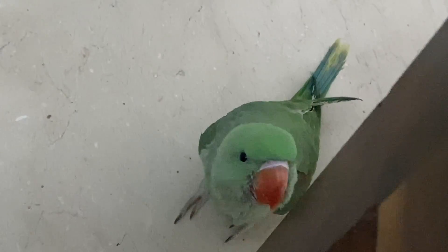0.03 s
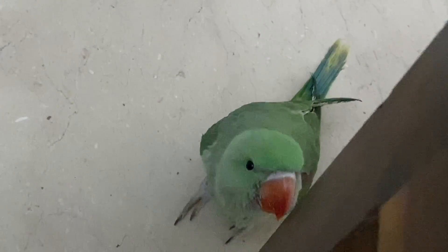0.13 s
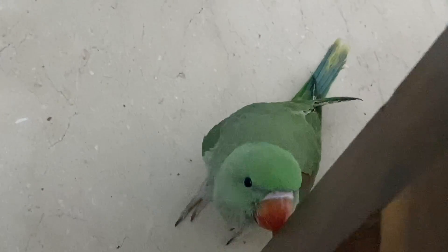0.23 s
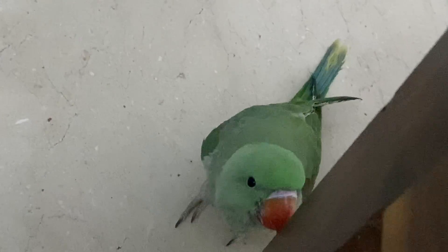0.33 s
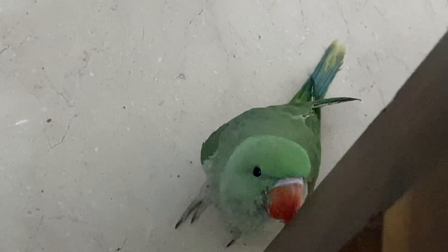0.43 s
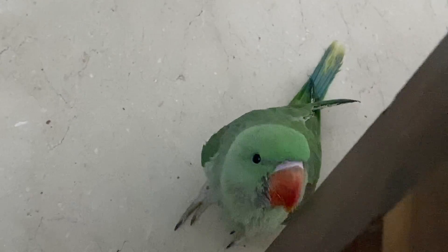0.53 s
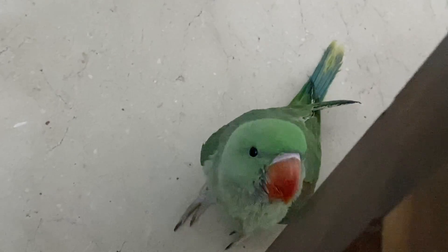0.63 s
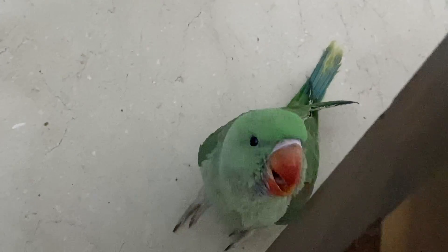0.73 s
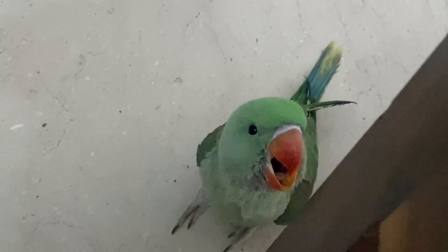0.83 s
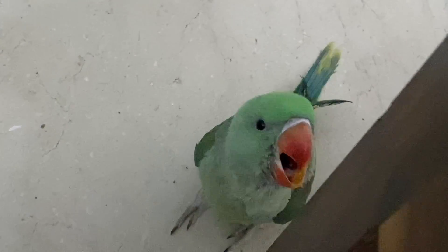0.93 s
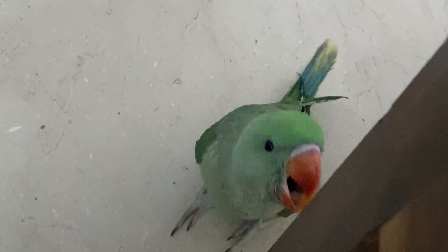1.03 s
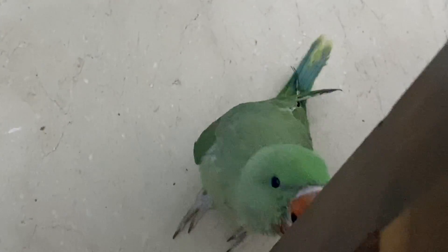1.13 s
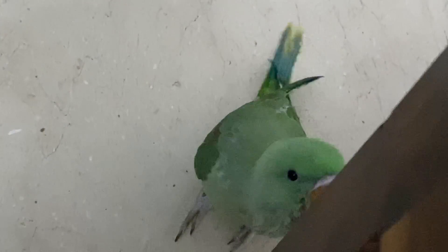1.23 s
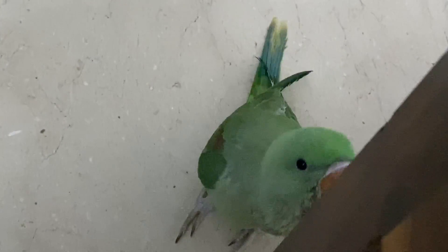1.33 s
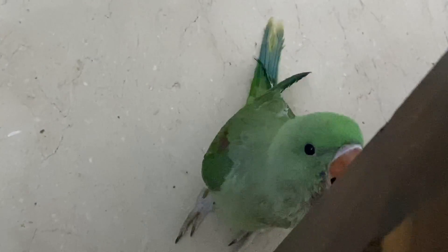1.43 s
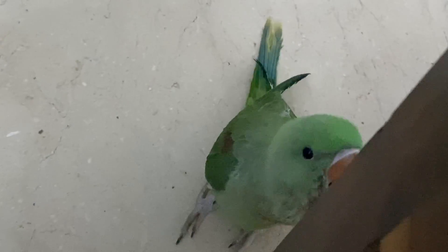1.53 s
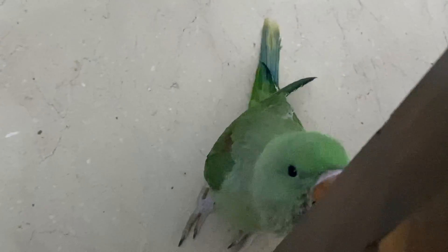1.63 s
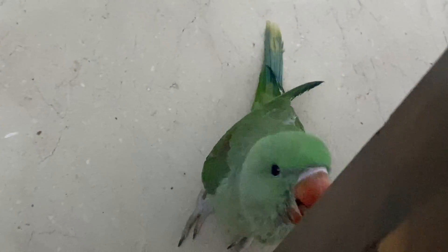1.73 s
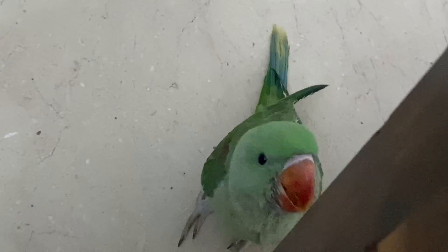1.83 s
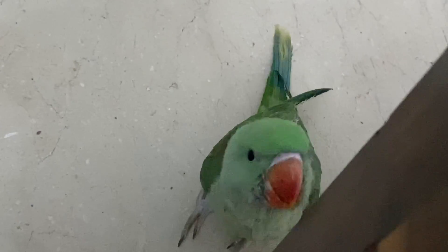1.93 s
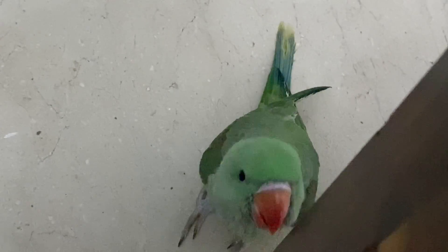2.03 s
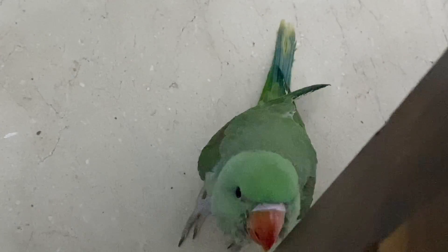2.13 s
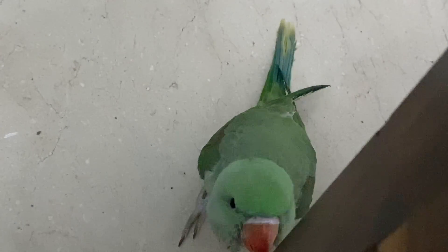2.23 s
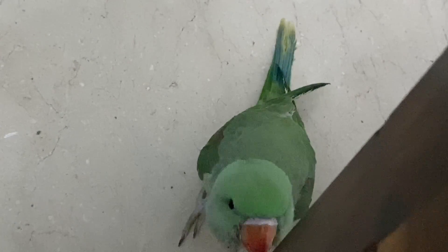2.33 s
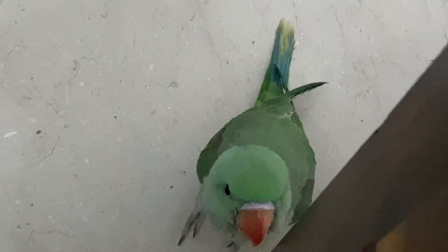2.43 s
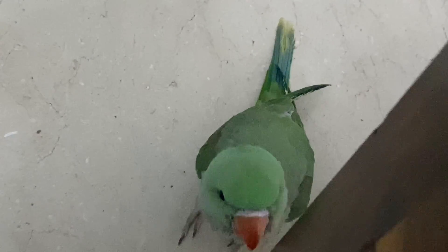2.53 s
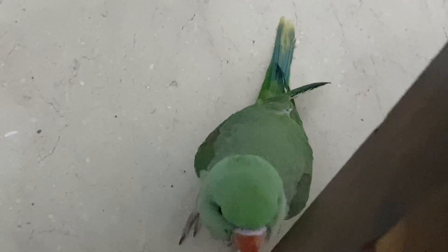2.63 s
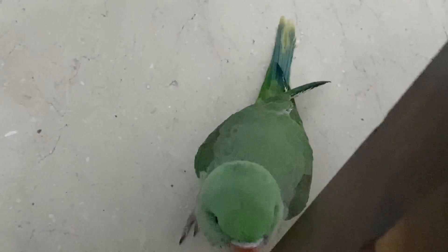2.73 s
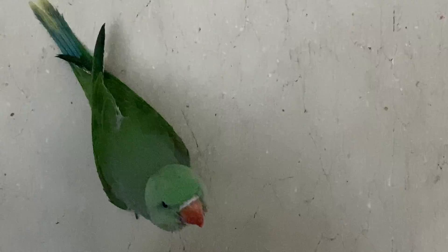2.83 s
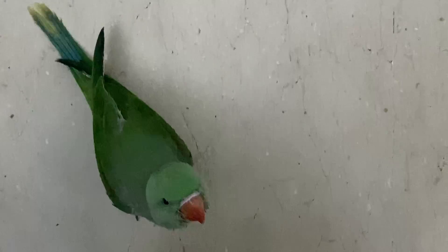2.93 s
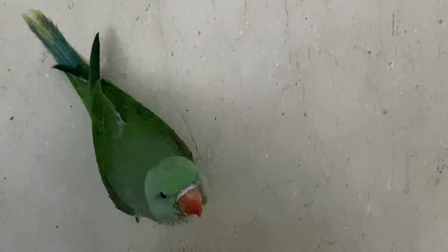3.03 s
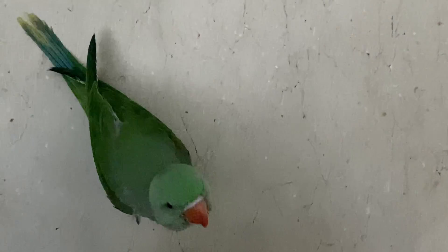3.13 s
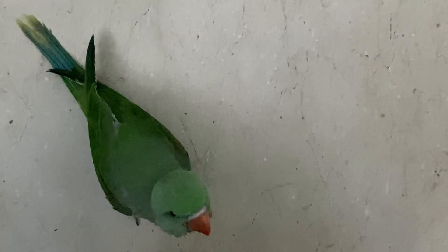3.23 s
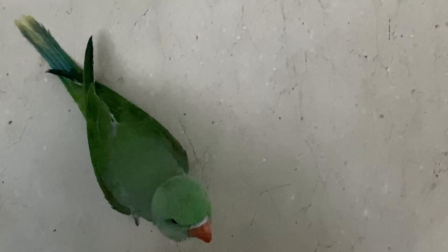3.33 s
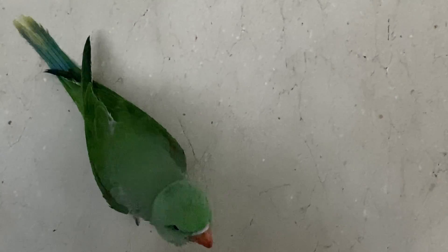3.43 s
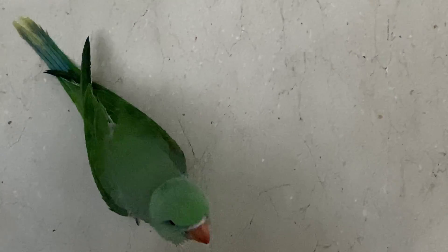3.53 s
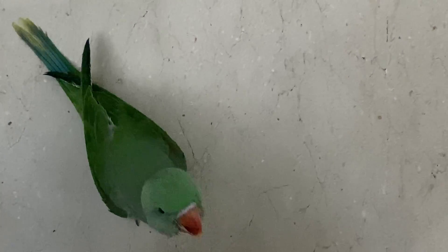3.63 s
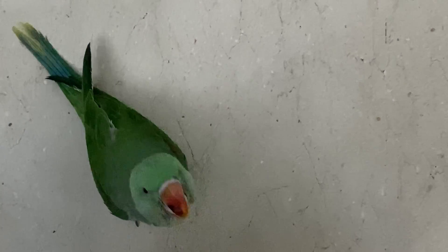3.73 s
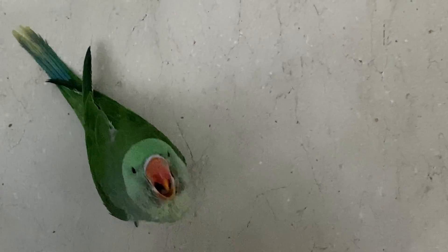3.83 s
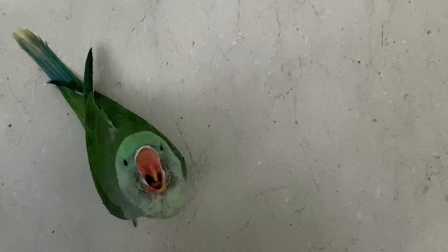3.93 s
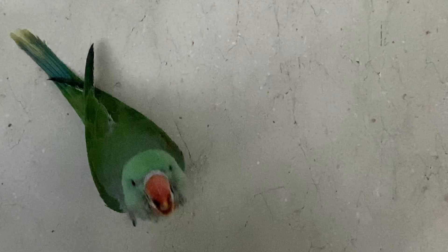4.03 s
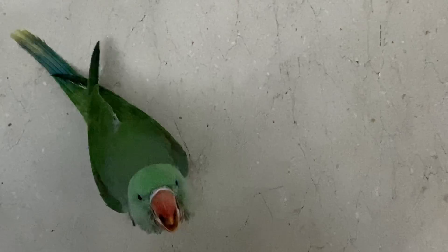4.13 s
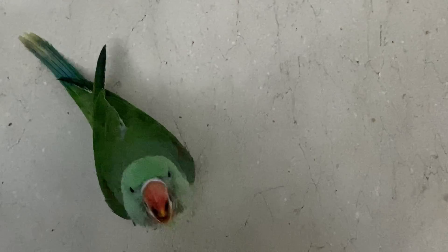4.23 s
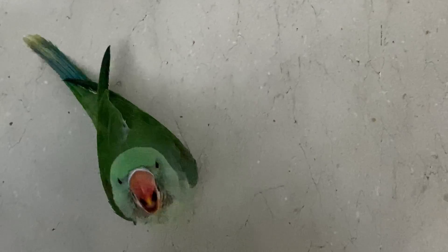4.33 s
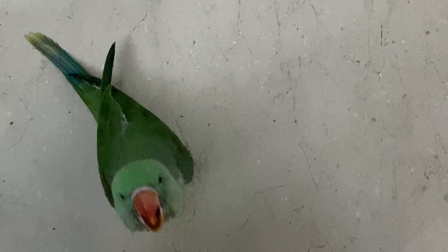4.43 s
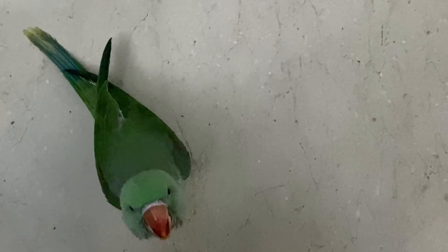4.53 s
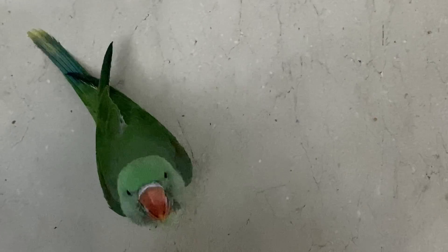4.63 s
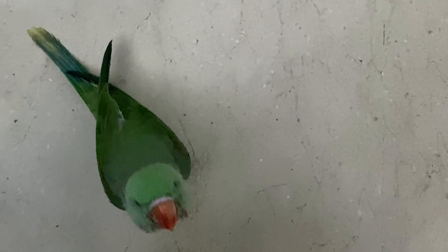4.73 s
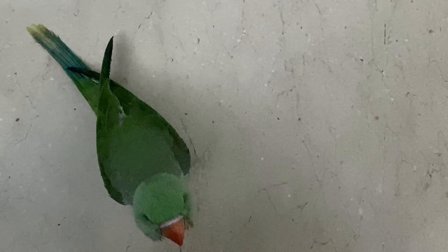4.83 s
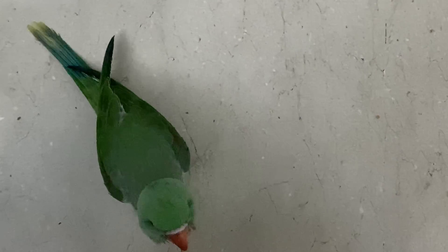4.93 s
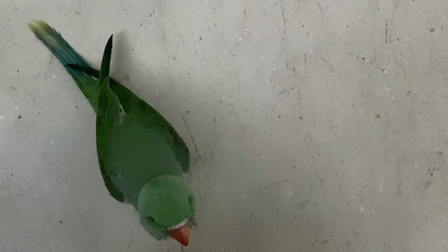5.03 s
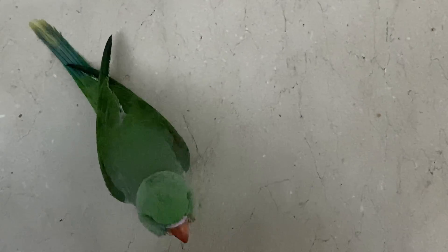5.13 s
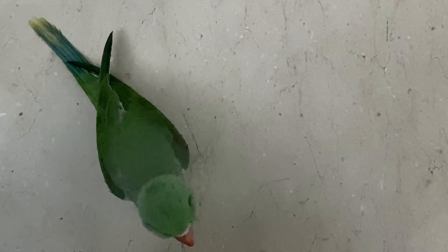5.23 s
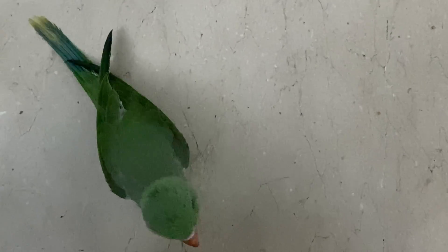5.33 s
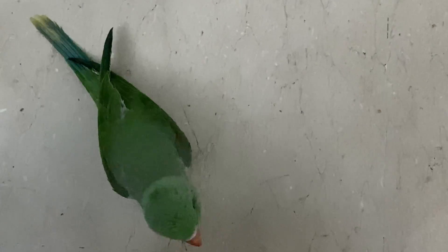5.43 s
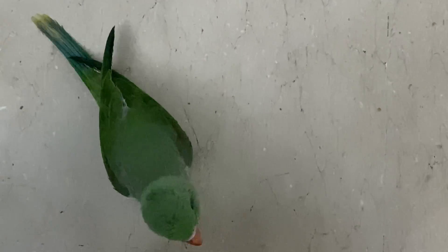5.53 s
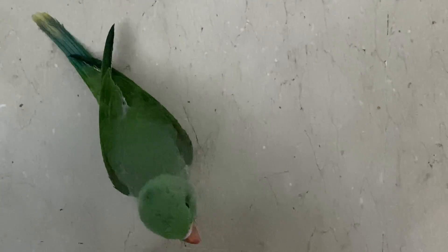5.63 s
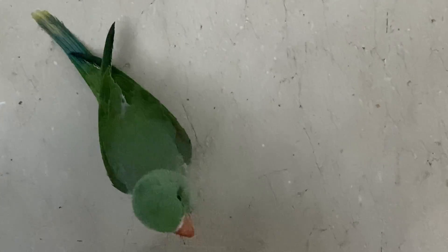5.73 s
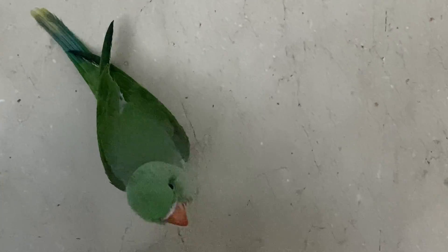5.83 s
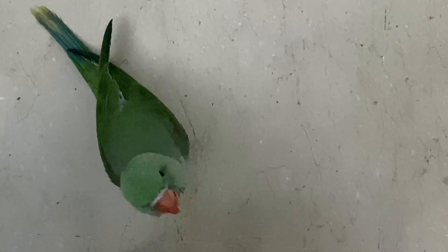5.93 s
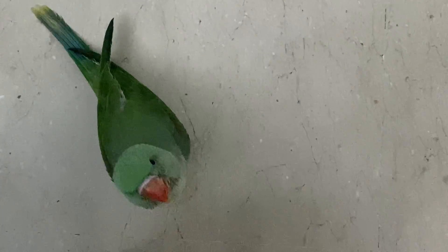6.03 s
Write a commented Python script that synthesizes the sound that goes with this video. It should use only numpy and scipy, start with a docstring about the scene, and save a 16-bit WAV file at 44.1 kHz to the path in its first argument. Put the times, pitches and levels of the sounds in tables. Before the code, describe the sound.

A parrot close by gives two pairs of harsh, trilling squawks in a small hard room, each ringing briefly over a low steady rumble.

```python
"""A parrot on a hard floor gives two pairs of harsh squawks, close to the microphone, in a small room.
Each squawk opens with a low, rough croak, the second one's ending in a clear burst; then it leaps up,
trills about thirty times a second and sinks. It is a stack of harmonics that sweeps through the
resonances of throat and beak. After each one the room rings briefly: noise tails that die band by band.
All along lies a low steady rumble of filtered noise with a few wavering hum lines."""
import sys
import numpy as np
from scipy import signal
from scipy.fft import rfft, irfft, next_fast_len
from scipy.io import wavfile
from scipy.ndimage import uniform_filter1d

SR = 44100
rng = np.random.default_rng(int(sys.argv[2]) if len(sys.argv) > 2 else 0)


def log_audio(samples):
    """Write samples as a 16-bit WAV file to the path given in sys.argv[1]."""
    # one column per channel
    frames = np.atleast_2d(samples).T
    # limit to full scale, then quantise
    limited = np.clip(frames, -1, 1)
    pcm = np.round(limited * 32767).astype(np.int16)
    wavfile.write(sys.argv[1], SR, pcm)


N = 268569  # length in samples, about 6.1 s
EDGE_HZ = 15900  # nothing sounds above this
LEAP_S = 0.0085  # sets how long the leap in pitch takes


def squawk(course, push, trill, depth, tone, croak):
    """The syrinx buzzes with a fast trill; each harmonic swells as it crosses a resonance of the throat."""
    # the voice flips to a higher register:
    # [start/s, end/s, pitch factor, extra level/dB, factor on the trill depth]
    flip = (0.8255, 0.875, 1.295, 5.5, .8)
    accent_lead_s, accent_s = 0.0075, 0.006  # the accent is centred this long before the croak ends; half width
    shut, open_s = 0.18, 0.02  # the half-shut beak lowers the resonances by this share, then opens
    jitter, croak_jitter = 0.0018, 0.21  # random shares of the pitch
    air_db, croak_air_db = -40, -5  # air beside the harmonics, before the level is evened
    throb_db = 1.18
    flick = 0.26  # share of the pitch lost at the very end

    start, end, leap = course[:3]
    crest_s, rate, change = trill
    beak, fundamental_db, opening_db, bright_db, top_db = tone
    croak_end, croak_factor, croak_rough, croak_db, accent_db = croak
    flip_start, flip_end, flip_factor, flip_db, flip_trill = flip
    t = np.arange(start, end, 1 / SR)

    # the membranes flap slowly and irregularly until the tone takes hold
    low = between(t, 0, croak_end, size=220)
    high = between(t, flip_start, flip_end, size=90)
    rasp = croak_rough * low

    swing = 2 * np.pi * (t - crest_s) * (rate + change * (t - crest_s) / 2)
    depth_hz = trill_depth(t, leap, *depth)
    trill_shape = np.cos(swing) - 0.21 * np.cos(2 * swing)  # round crests, sharp troughs
    hz = melody(t, *course) + depth_hz * flip_trill ** high * trill_shape
    hz = hz * croak_factor ** low * flip_factor ** high
    hz *= 1 - flick * np.exp((t - t[-1]) / 0.0045)  # the pitch falls away as the pressure ends
    shake = (jitter * (1 - high) + croak_jitter * rasp) * wobble(len(t), hz=700)
    turns = np.cumsum(hz * (1 + shake)) / SR

    gape = beak * (1 - shut * np.exp((start - t) / open_s))
    first_db = fundamental_db + opening_db * (1 - low) * soft_step((leap - t) / LEAP_S)

    def resonance(f, opening):
        return throat(f, opening, bright_db, top_db)

    voice = harmonics(hz, turns, low, high, first_db, croak_db, lambda f: resonance(f, gape))
    voice += gain_of(air_db) * air(turns, lambda f: resonance(f, beak))
    croak_air = air(turns, lambda f: resonance(f, beak * (1 - shut / 2)))
    voice += gain_of(croak_air_db) * rasp * croak_air

    # effort sets the level over about a whole trill cycle
    voice /= np.sqrt(uniform_filter1d(voice ** 2, size=1400) + 1e-9)
    accent = np.exp(-((t - croak_end + accent_lead_s) / accent_s) ** 2)
    level_db = effort(t, *push) + accent_db * accent + flip_db * high
    # the troughs of the trill throb louder; in the high register the crests do
    throb = np.cos(swing) * (2 * high - 1) * np.clip(depth_hz / 100, 0, 1.5)
    soft_ends = signal.windows.tukey(len(t), 0.015)
    return t[0], gain_of(level_db + throb_db * throb) * voice * soft_ends


def harmonics(hz, turns, low, high, first_db, croak_db, resonance):
    """Stacks sixteen sine partials, each coloured by the throat and swaying on its own."""
    shimmer = 0.059  # random share of each partial's strength
    voice = np.zeros(len(hz))
    for k in range(1, 17):
        # the high register is nearly pure, with weak even harmonics
        if k == 1:
            source_db = first_db * (1 - high)
        else:
            source_db = -high * (2 if k % 2 else 16 / np.sqrt(k))
        # the croak carries more weight in its low partials
        source_db = source_db + low * croak_db * read([(1000, 1), (2000, 0)], k * hz)
        # the upper harmonics break up and return
        breaks_db = (3.5 if k > 2 else 1.2) * (1 - high) * wobble(len(hz), hz=60)
        flutter = 1 + shimmer * (1 - high) * wobble(len(hz), hz=310)
        strength = gain_of(source_db + breaks_db) * resonance(k * hz) * (k * hz < EDGE_HZ)
        voice += strength * flutter * np.sin(2 * np.pi * k * turns)
    return voice


def throat(f, gape, bright_db, top_db):
    """Throat and beak strengthen some pitches; a wider beak moves these resonances up."""
    # resonances of throat and beak, before the beak shifts them: [f/Hz, relative level/dB]
    throat_curve = [(500, -32.5), (900, -19.5), (1300, -25), (1750, -15), (2150, -9.5), (2600, 0),
                    (3000, 2.5), (3650, -5), (4250, -13), (4800, -19.5), (5700, -17), (6800, -18),
                    (7800, -18.5), (8600, -28.5), (10700, -32.5), (15500, -52)]
    brightness = [(3600, 0.00049), (6000, bright_db), (11000, top_db)]
    return gain_of(read(throat_curve, f / gape) + read(brightness, f))


def air(turns, resonance):
    """Air escapes as noise in one puff a cycle, coloured by the throat."""
    puffs = wobble(len(turns), hz=18120) * (1 + np.cos(2 * np.pi * turns))
    return evened(filtered(puffs, resonance))


def melody(t, start, end, leap, low_hz, top_hz, final_hz):
    """Centre pitch: scoops to a low note as pressure builds, leaps to the top, sinks, and drops away."""
    scoop, scoop_s = 0.18, 0.0166  # share of the pitch missing at the start, and its time
    drop, drop_s = 0.14, 0.0236  # share of the pitch lost as pressure ends, and its time
    sink_power = 2.83  # higher = stays longer at the top
    progress = np.clip((t - leap) / (end - leap), 0, 1)
    sinking_hz = top_hz + (final_hz - top_hz) * np.sin(np.pi / 2 * progress) ** sink_power
    hz = low_hz + (sinking_hz - low_hz) * soft_step((t - leap) / LEAP_S)
    return hz * (1 - scoop * np.exp((start - t) / scoop_s) - drop * np.exp((t - end) / drop_s))


def trill_depth(t, leap, full_hz, calm):
    """Depth of the trill in Hz: grows after the leap, then calms to a slight quiver."""
    rest, grow_s, calm_s = 0.29, 0.038, 0.0214  # share of the depth that always stays, and times
    grown = 1 - np.exp(-np.maximum(t - leap, 0) / grow_s)
    return full_hz * (rest + (1 - rest) * grown * soft_step((calm - t) / calm_s))


def effort(t, attack_db, attack_s, swell_db_per_s, climax, climax_db):
    """Level in dB: quick attack, slow swell to the climax, fade, quick release."""
    fade_db_per_s, release_db, release_s = 41, 12.5, 0.011
    rising = np.cos(np.pi / 2 * np.minimum((t - t[0]) / attack_s, 1)) ** 2
    arch_db = np.minimum(swell_db_per_s * (t - climax), fade_db_per_s * (climax - t))
    return climax_db + arch_db - attack_db * rising - release_db * np.exp((t - t[-1]) / release_s)


def bounced(sound, bounce):
    """Two very short reflections comb the call, so that gliding harmonics swell and dip."""
    paths = np.reshape(bounce, (2, 2))
    return filtered(sound, lambda f: 1 + reflections(f, paths))


def reflections(f, paths):
    """Each reflection is a weaker copy that comes later; paths hold pairs of delay in s and level in dB."""
    return sum(gain_of(db) * np.exp(-2j * np.pi * f * s) for s, db in paths)


def nearby(x):
    """The direct sound and its first echoes stand out of step on the left and right."""
    # furniture and walls nearby: [delay/s, level/dB before the beam]
    echo_paths = [(.0037, -21), (.0056, -20.5), (0.0109, -19.5), (0.017, -22), (0.028, -22)]
    # the open beak beams its treble at them: [f/Hz, extra level/dB]
    beam = [(2500, -2.5), (3500, 5), (5000, 6), (7000, 5), (12000, 0.5)]
    # phase by which the left leads the right: [f/Hz, phase/rad]
    lead_phase = [(800, -4.5), (1350, 1.74), (2000, 0.37), (3100, 0.41), (4000, 0.15), (7200, 0),
                  (8000, -1.6), (8900, -3.5), (9600, -2.5), (10700, -7.5), (11700, -7.5), (13300, -11),
                  (15500, -8)]

    def response(f):
        echoes = 1 + gain_of(read(beam, f)) * reflections(f, echo_paths)
        left_right = np.exp(0.5j * np.outer([1, -1], read(lead_phase, f)))
        return echoes * left_right

    return filtered(x, response)


def room(x):
    """A dense tail that builds up, then dies in each band at its own speed."""
    # time in which the ring falls by 60 dB: [f/Hz, time/s]
    ring_time = [(500, 0.5), (1500, .5), (2800, 0.6122), (4000, 0.5745), (6000, 0.51), (8000, 0.6),
                 (14000, 0.25)]
    # tone colour of the ring: [f/Hz, relative level/dB]
    ring_colour = [(500, -12), (1400, -4), (2000, -8), (2700, -8.5), (3400, -12.5), (4200, -7),
                   (6000, -10.5), (8000, -19), (14000, -20)]
    hz, t, z = signal.stft(rng.standard_normal((2, SR)), SR, nperseg=256)
    build = 1 - np.exp(-t / 0.014)
    decay = build * gain_of(-60 * t / read(ring_time, hz)[:, None])
    tails = signal.istft(z * decay, SR, nperseg=256)[1]
    tails /= np.linalg.norm(tails[0])
    coloured = filtered(x, lambda f: gain_of(read(ring_colour, f)))
    return diffuse(*signal.fftconvolve(coloured[None], tails, axes=1)[:, :N])


def diffuse(a, b):
    """Two unrelated sounds become a left-right pair, as alike in each band as the likeness curve says."""
    # how alike left and right are, nearly the same in the treble: [f/Hz, likeness (1 = the same)]
    likeness = [(60, 1), (130, 0.76), (290, .82), (640, 0.41), (1400, 0.3), (3100, 0.99), (6800, 1),
                (15000, .6)]

    def same(f):
        return np.clip(read(likeness, f), -1, 1)

    mid = filtered(a, lambda f: np.sqrt((1 + same(f)) / 2))
    side = filtered(b, lambda f: np.sqrt((1 - same(f)) / 2))
    return np.array([mid + side, mid - side])


def background():
    """Low room rumble of noise with a few wavering hum lines, a little stronger on the left."""
    # spectrum of the rumble: [f/Hz, relative level/dB per Hz]
    rumble_curve = [(15, -58.5), (25, -24.5), (40, -15.5), (54, -5.5), (128, -4.5), (163, -9), (196, -3.5),
                    (231, -6.5), (257, -6), (438, -15.5), (833, -17), (927, -16.5), (1310, -26.5),
                    (3010, -36.5), (15000, -73.5)]
    # hum lines, before the shared hum_db below: [f/Hz, level/dB]
    hum_lines = [(64, -66), (87, -62), (126, -66.5), (200, -60.5), (263, -67)]
    rumble_db, hum_db = -55, -1
    waver = 0.79  # random share of each hum line's strength
    lean_db = 0.46  # left up and right down by this much
    noise = filtered(rng.standard_normal((2, N)), lambda f: gain_of(read(rumble_curve, f)))
    rumble = gain_of(rumble_db) * evened(diffuse(*noise))
    t = np.arange(N) / SR
    hum = np.zeros(N)
    for hz, db in hum_lines:
        strength = 1 + waver * wobble(N, hz=2.6)
        line = strength * np.sin(2 * np.pi * hz * t + wobble(N, hz=6.2))
        hum += gain_of(db + hum_db) * evened(line)
    return (rumble + hum) * gain_of([[lean_db], [-lean_db]])


def gain_of(db):
    """Decibels to amplitude."""
    return 10 ** (np.asarray(db) / 20)


def evened(x):
    """Scales to an rms of one."""
    return x / np.sqrt(np.mean(x ** 2) + 1e-20)


def read(points, hz):
    """Reads a curve between its points on a log-frequency axis."""
    f, value = np.transpose(points)
    return np.interp(np.log(hz + 1), np.log(f + 1), value)


def filtered(x, response):
    """Applies a response given as a function of frequency."""
    size = next_fast_len(x.shape[-1] + 4096)  # spare room at the end for delayed sound
    spectrum = rfft(x, size) * response(np.fft.rfftfreq(size, 1 / SR))
    return irfft(spectrum, size)[..., :x.shape[-1]]


def wobble(size, hz):
    """Random motion of rms about one, mostly slower than hz."""
    slow = filtered(rng.standard_normal(N), lambda f: 1 / (1 + (f / hz) ** 4))
    return evened(slow)[:size]


def between(t, start, end, size):
    """One from start to end, zero elsewhere, with soft edges of size samples."""
    return uniform_filter1d(1.0 * ((t > start) & (t < end)), size=size)


def soft_step(u):
    """Rises smoothly from zero to one as u passes zero."""
    return (1 + np.tanh(u)) / 2


def add(mix, s, sound):
    """Lays a sound into the mix at time s."""
    part = mix[round(s * SR):][:len(sound)]
    part += sound[:len(part)]


def scene():
    """Four squawks, heard directly and through the room, over the background."""
    # All these tables have one row a squawk.
    # melody, before scoop, croak and trill bend it:
    # [start/s, end/s, time of the leap/s, pitch before it/Hz, top pitch/Hz, final pitch/Hz]
    courses = [(0.743, 1.095, .7844, 1366, 2001, 1392), (1.23, 1.576, 1.2926, 1640, 1854, 1358),
               (3.602, 3.963, 3.6469, 1487, 2067, 1413), (4.106, 4.443, 4.1574, 1466, 1821, 1364)]
    # the push behind the voice swells to a climax:
    # [attack rise/dB, attack/s, swell/dB per s, climax time/s, level there/dB before the mix]
    pushes = [(19.5, 0.046, 1, 1.009, -21), (8, 0.034, 18, 1.485, -18.5), (12.5, 0.047, 27.5, 3.848, -16),
              (5.5, 0.011, 5.5, 4.312, -17.5)]
    # beat of the trill: [time of one crest/s, rate there/Hz, change of rate/Hz per s]
    trills = [(.7939, 29.92, 9.86), (1.3094, 29.43, 6.34), (3.6599, 31.6, -3.39), (4.1717, 28.75, 14.11)]
    # size of the trill: [full depth/Hz before its shape and the flip, time it calms/s]
    depths = [(160, 1.003), (169, 1.486), (182, 3.871), (152, 4.361)]
    # tone: [beak opening as a factor on the resonances, fundamental/dB, more of it before the leap/dB,
    # overtones at 6 kHz/dB, overtones at 11 kHz/dB]
    tones = [(1.023, 2.5, 7.5, 4.5, 3.5), (0.98, 2, 1.5, 1.5, -8), (0.99, 2, 9.5, -0.5, 4),
             (0.96, 3.5, 0.5, -4.5, -3.5)]
    # opening croak: [end/s, pitch factor, roughness 0-1, boost of its low partials/dB,
    # brief accent near its end/dB (a clear burst in the second row, a dip if negative)]
    croaks = [(.757, 0.56, 0.8, 16.5, 1), (1.26, 0.58, .3, 5, 7.5), (3.615, 0.7, 0.6, 15, 0.5),
              (4.123, 0.42, 0.82, 11, -2)]
    # bounces off floor and skirting, which move with the head: [delay/s, level/dB, delay/s, level/dB]
    bounces = [(.000343, -16.5, .00188, -15.5), (.0009, -11, 0.0024, -13.5), (.000428, -20.5, .0018, -18.5),
               (.001136, -16, 0.000694, -14)]
    # how strongly the squawk fills the room as the head turns: [level/dB before the mix]
    spills_db = [.7, 0.44, -0.62, -1.1]
    direct_db, room_db = -1.11, -4

    spill, direct = np.zeros((2, N))
    rows = zip(courses, pushes, trills, depths, tones, croaks, bounces, spills_db)
    for *call, bounce, spill_db in rows:
        s, sound = squawk(*call)
        add(spill, s, gain_of(spill_db) * sound)
        add(direct, s, bounced(sound, bounce))
    return gain_of(direct_db) * nearby(direct) + gain_of(room_db) * room(spill) + background()


def record(dry):
    """The band limit of the recorder: a steep low-pass filter."""
    low_pass = signal.firwin(511, EDGE_HZ, window=("kaiser", 9), fs=SR)
    return signal.oaconvolve(dry, low_pass[None], "same")


dry = scene()
out = record(dry)
log_audio(out)
```